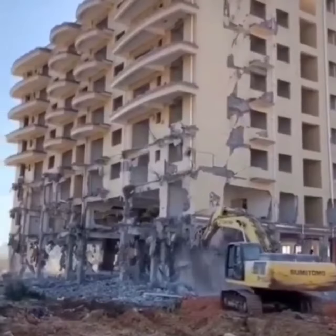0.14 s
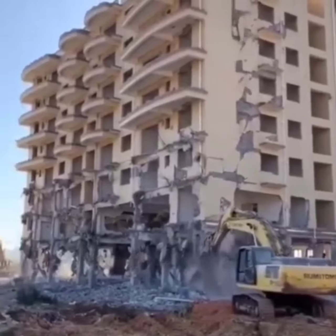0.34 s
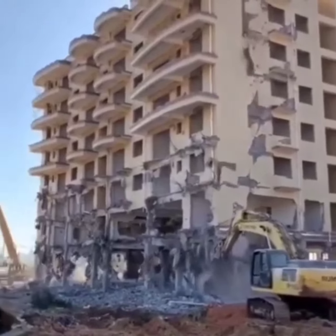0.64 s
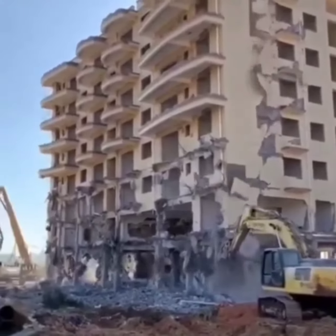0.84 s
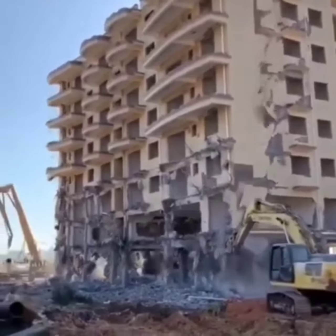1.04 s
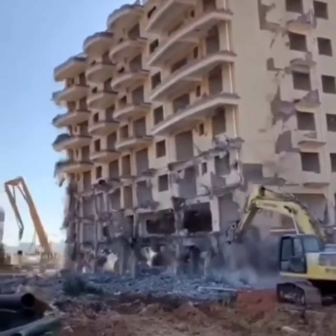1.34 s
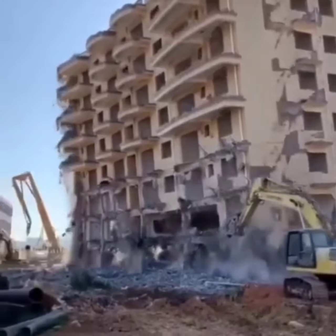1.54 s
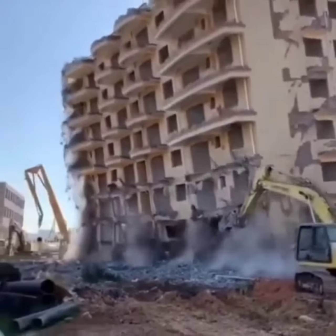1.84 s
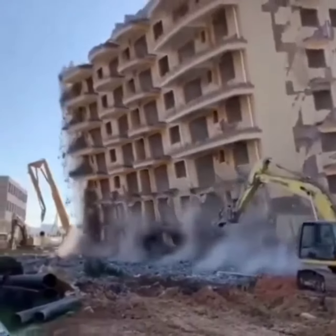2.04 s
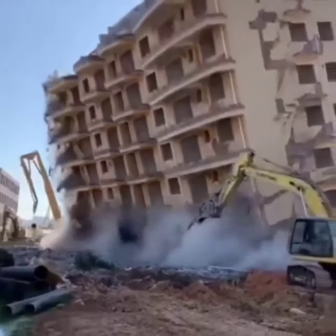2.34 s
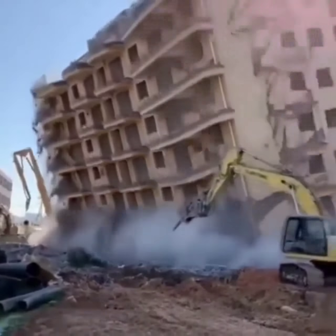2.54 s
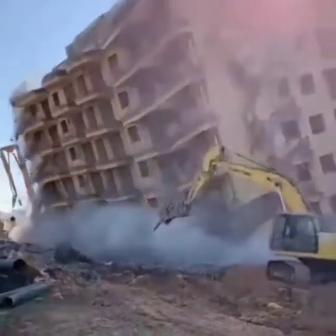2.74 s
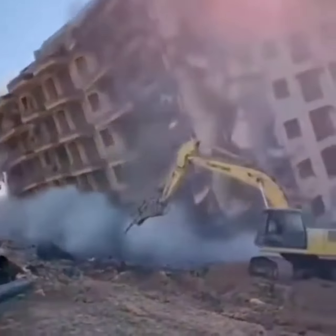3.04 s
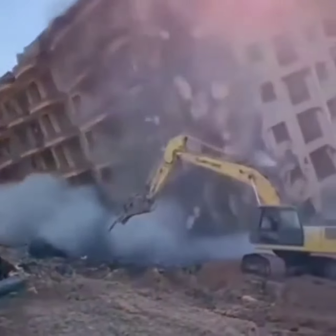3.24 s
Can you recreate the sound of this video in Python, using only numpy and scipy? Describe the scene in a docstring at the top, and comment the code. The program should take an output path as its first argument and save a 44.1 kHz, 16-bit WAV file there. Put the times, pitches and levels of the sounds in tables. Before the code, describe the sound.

A tall concrete building collapses in a continuous roar of sliding rubble over a deep rumble. Slabs thud and chunks crack and clink throughout, heard outdoors from tens of metres away, with a faint diesel hum underneath.

```python
"""A demolition site, some tens of metres from a tall concrete building as it topples.
An excavator's diesel hums beneath the rumble of the ground. Blocks tumble, slabs thud, and a dense
slide of rubble and grit roars, with single cracks, clinks and spills on top. The facades around answer
the single hits. One fixed microphone, with a narrow notch in the treble."""
import sys
import numpy as np
from scipy import signal
from scipy.fft import rfft, irfft, next_fast_len
from scipy.io import wavfile
from scipy.ndimage import uniform_filter1d, map_coordinates

SR = 44100
rng = np.random.default_rng(int(sys.argv[2]) if len(sys.argv) > 2 else 0)


def master(y):
    """Save y as 16-bit WAV."""
    cut = np.clip(np.atleast_2d(y).T, -1, 1)
    pcm = np.round(cut * 32767)  # scale
    wavfile.write(sys.argv[1], SR, pcm.astype(np.int16))


N = 149940  # 3.4 s


def amp(db):
    """Decibels to gain."""
    return 10 ** (np.asarray(db) / 20)


def unit(x):
    """Scaled to rms 1."""
    return x / np.sqrt(np.mean(x ** 2) + 1e-20)


def along(points, hz):
    """(frequency, value) points read on a log frequency axis."""
    knots_hz, values = np.transpose(points)
    return np.interp(np.log(hz + 1), np.log(knots_hz + 1), values)


def curves(rows):
    """One value per sample for each column after the time."""
    times, *columns = np.transpose(rows)
    return [np.interp(np.arange(N) / SR, times, column) for column in columns]


def wobble(rate, samples=N, knots=1024):
    """A smooth random curve, rate knots a second."""
    return map_coordinates(rng.standard_normal(knots), [np.arange(samples) * rate / SR], mode="wrap")


def filtered(x, response):
    """x through a filter whose gain is response(hz)."""
    n = x.shape[-1]
    padded = next_fast_len(n + SR // 4)
    return irfft(rfft(x, padded) * response(np.fft.rfftfreq(padded, 1 / SR)), padded)[:n]


def coloured(x, colour):
    """x shaped by a spectrum, at rms 1."""
    return unit(filtered(x, lambda hz: amp(along(colour, hz))))


def tone(hz, drift):
    """A sine at rms 1, its phase pushed about by drift (radians)."""
    t = np.arange(len(drift)) / SR
    return np.sqrt(2) * np.sin(2 * np.pi * hz * t + drift)


def add(track, start_s, sound):
    """Mixes a sound into the track."""
    part = track[max(round(start_s * SR), 0):][:len(sound)]
    part += sound[:len(part)]


def impacts(lo_hz, hi_hz, cycles, spread_db, count, size):
    """A shower of random knocks, each size samples long and dying by 60 dB over so many cycles."""
    when, pitch, strength, polarity = rng.random((count, 4)).T[:, :, None]
    hz = lo_hz * (hi_hz / lo_hz) ** pitch
    age = np.arange(size)
    phase = hz * age / SR
    strength_db = -spread_db * np.log(np.maximum(strength, .01))
    envelope = hz * amp(strength_db - 60 * phase / cycles)  # the factor hz keeps the shower about flat
    knocks = envelope * np.sin(2 * np.pi * phase) * np.sign(polarity - .5)
    positions = (when * N).astype(int) + age
    return unit(np.bincount(positions.ravel(), knocks.ravel(), N)[:N])


def wash(patchy_db, size):
    """The blur of countless hidden impacts: noise in which single pitches flare up briefly."""
    frames = dict(nperseg=size, noverlap=size * 3 // 4)
    spectra = signal.stft(rng.standard_normal(N), **frames)[2]
    flares = uniform_filter1d(rng.standard_normal(spectra.shape), size=3, axis=0)
    flares = unit(uniform_filter1d(flares, size=5, axis=1))
    return signal.istft(spectra * amp(patchy_db * np.minimum(flares, 2)), **frames)[1][:N]


def fall(knocks, blur, colour, wash_db):
    """Near knocks over the wash of the hidden ones."""
    return unit(coloured(knocks, colour) + amp(wash_db) * coloured(blur, colour))


# reverberation between the buildings around the site (frequency [Hz], t60 [s])
FACADE_DECAY = [(100, 1), (1000, 0.67), (7000, 0.33)]
def facades(x, wet_db):
    """The direct sound with its diffuse answer from the buildings; the treble dies first."""
    hz, t, spectra = signal.stft(rng.standard_normal(SR // 2), SR, nperseg=256)
    decay = amp(-60 * t / along(FACADE_DECAY, hz)[:, None])
    tail = signal.istft(spectra * decay, SR, nperseg=256)[1]
    return x + amp(wet_db) * signal.fftconvolve(x, tail / np.linalg.norm(tail))[:N]


# the engine's firing lines (frequency [Hz], level [dB])
DIESEL_LINES = [(59, -37.5), (88.5, -41)]
def diesel(drift_rad=0.69):
    """The excavator's engine hums unsteadily under the collapse."""
    return sum(amp(db) * tone(hz, drift_rad * wobble(3.58)) for hz, db in DIESEL_LINES)


# swell of the ground rumble (time [s], level [dB])
RUMBLE_SWELL = [(0.0, -42), (0.28, -30.5), (0.48, -32), (0.63, -34), (0.78, -30), (0.84, -33), (0.93, -26),
                (1.2, -31), (1.32, -30), (1.42, -26), (1.66, -31), (1.8, -23), (2.1, -25.5), (2.25, -27),
                (2.45, -26.5), (2.54, -32), (2.66, -25), (2.95, -28), (3.12, -31.5), (3.21, -38),
                (3.27, -25), (3.4, -28.5)]
# its spectrum (frequency [Hz], relative level [dB])
RUMBLE_SPECTRUM = [(10, -21.5), (22, -6.5), (42, 3.5), (60, 2), (85, -2.5), (115, -5), (200, -36),
                   (500, -63)]
def rumble(gain_db=-2.0, lumpy_db=1):
    """The ground and the falling mass shake the air."""
    level_db, = curves(RUMBLE_SWELL)
    envelope = amp(level_db + gain_db + lumpy_db * wobble(11))
    return envelope * coloured(rng.standard_normal(N), RUMBLE_SPECTRUM)


# loose debris landing (time [s], level [dB], length before release [s], band centre [Hz])
DEBRIS_SPILLS = [(0.154, -32, 0.039, 1100), (0.323, -33, 0.028, 3300), (0.551, -34, 0.026, 2700),
                 (0.718, -34, 0.027, 2700), (0.857, -29.5, 0.031, 2380), (0.921, -34, 0.049, 1690),
                 (1.307, -29.5, 0.019, 3800), (1.407, -29.5, 0.13, 1400), (1.56, -26.5, 0.029, 2010),
                 (1.641, -29, 0.023, 2800), (1.908, -31.5, 0.026, 2800), (2.098, -27.5, 0.04, 1300),
                 (2.159, -34.5, 0.018, 6000), (2.304, -33, 0.025, 2600), (2.964, -32, 0.021, 4500)]
# spectrum of crumbling and splintering debris (frequency [Hz], relative level [dB])
DEBRIS_SPECTRUM = [(200, -20.5), (600, -1.5), (1500, -2.5), (2600, -7), (4000, -26.5), (7500, -18)]
def spills(gain_db=0, attack_s=0.0064, release_t60=0.15, width_octaves=0.91):
    """Loads of loose debris crumble onto the heap; the finer the pieces, the higher the burst."""
    out, t = np.zeros(N), np.arange(SR) / SR
    for start, db, length, centre_hz in DEBRIS_SPILLS:
        envelope = (1 - np.exp(-t / attack_s)) * amp(-60 * np.maximum(t - length, 0) / release_t60)
        band = lambda hz: np.exp(-.5 * (np.log2((hz + 1) / centre_hz) / width_octaves) ** 2)
        pieces = filtered(wash(patchy_db=1.5, size=1024)[:SR], band)
        add(out, start, amp(db + gain_db) * envelope * coloured(pieces, DEBRIS_SPECTRUM))
    return out


# chunks of concrete snapping and knocking together (time [s], level [dB], pitch [Hz])
CONCRETE_CRACKS = [(.155, -27, 546), (.168, -31.5, 770), (.228, -26.5, 522), (.246, -29, 1098),
                   (0.795, -22, 1620), (.803, -24, 495), (0.955, -29, 1134), (1.128, -24, 1018),
                   (1.435, -26.5, 760), (1.532, -24, 1593), (1.646, -25, 1404), (1.692, -24.5, 660),
                   (1.719, -25.5, 1210), (1.794, -26, 760), (2.039, -23, 732), (2.18, -30.5, 1376),
                   (2.227, -30, 1676), (2.363, -25, 735), (2.375, -25.5, 1654), (2.833, -23.5, 678),
                   (2.861, -26.5, 1515), (2.904, -31, 663), (3.018, -27.5, 1604), (3.089, -25, 1537),
                   (3.117, -26, 632), (3.138, -30.5, 1480), (3.189, -24, 737), (3.272, -27, 1566)]
def cracks(attack_s=0.004, clack_t60=0.14, splinter_db=-2, splinter_t60=0.1):
    """Concrete snaps: a pitched clack under a shorter, broad splintering."""
    out, t = np.zeros(N), np.arange(SR) / SR
    for start, db, hz in CONCRETE_CRACKS:
        clack = amp(-60 * t / clack_t60) * tone(hz, 0.66 * wobble(hz / 6, len(t)))
        noise = coloured(rng.standard_normal(SR), DEBRIS_SPECTRUM)
        splinter = amp(splinter_db - 60 * t / splinter_t60) * noise
        add(out, start, amp(db) * (1 - np.exp(-t / attack_s)) * (clack + splinter))
    return out


# tile and reinforcing bar ringing out (time [s], level [dB], pitch [Hz])
TILE_AND_BAR_CLINKS = [(.195, -25, 2191), (.375, -29, 2568), (.995, -23, 2654), (1.18, -23, 1810),
                       (1.589, -21, 2245), (2.074, -27, 2396), (2.146, -30, 2220), (2.845, -26, 2055),
                       (2.906, -22, 1320), (3.355, -22.5, 1423)]
def clinks(gain_db=-1, attack_s=0.012, t60=0.16):
    """Hard pieces ring briefly as they strike the heap."""
    out, t = np.zeros(N), np.arange(SR) / SR
    for start, db, hz in TILE_AND_BAR_CLINKS:
        envelope = amp(db + gain_db - 60 * t / t60) * (1 - np.exp(-t / attack_s))
        add(out, start, envelope * tone(hz, 0.92 * wobble(hz / 6, len(t))))
    return out


# tumbling masonry (time [s], block level [dB], brick level [dB])
MASONRY_FLOW = [(0.05, -40, -36.5), (0.15, -34.5, -37), (0.29, -35.5, -37.5), (0.4, -30.5, -36.5),
                (0.63, -33.5, -36), (0.98, -30.5, -35.5), (1.25, -28.5, -32.5), (1.4, -29.5, -31.5),
                (1.6, -31, -32), (1.87, -33, -32), (1.97, -27.5, -35.5), (2.26, -29, -34),
                (2.55, -28.5, -32.5), (2.9, -29.5, -31.5), (2.97, -36, -33.5), (3.05, -26, -29),
                (3.14, -27.5, -32.5), (3.24, -28, -34), (3.35, -34.5, -31)]
# spectra of big blocks and of bricks (frequency [Hz], relative level [dB])
BLOCK_SPECTRUM = [(50, -27), (105, -1), (140, 0), (185, -1.5), (250, -8), (350, -19), (700, -46)]
BRICK_SPECTRUM = [(130, -18), (250, -4.5), (320, -1), (420, -2.5), (520, 0), (640, -7.5), (1200, -44)]
def masonry(block_db=-2, brick_db=-0.5):
    """Big blocks tumble with dull knocks, bricks with lighter ones."""
    block_flow_db, brick_flow_db = curves(MASONRY_FLOW)
    knocks = impacts(lo_hz=91.8, hi_hz=693, cycles=9.8, spread_db=2.17, count=700, size=6144)
    blur = wash(patchy_db=3.5, size=2048)
    blocks = fall(knocks, blur, BLOCK_SPECTRUM, wash_db=-2)
    bricks = fall(knocks, blur, BRICK_SPECTRUM, wash_db=3)
    return amp(block_flow_db + block_db) * blocks + amp(brick_flow_db + brick_db) * bricks


# heavy slabs landing (time [s], level [dB], pitch [Hz], t60 [s])
SLAB_LANDINGS = [(.235, -25, 80, 0.19), (0.509, -21, 199, 0.11), (.668, -16.5, 54, 0.12),
                 (0.704, -19.5, 184, 0.12), (.88, -16.5, 49, .2), (.903, -19.5, 185, 0.13),
                 (1.041, -22, 90.4, 0.19), (1.124, -16.5, 75, .15), (1.155, -24, 302, 0.14),
                 (1.204, -22.5, 66, 0.33), (1.322, -16.5, 142.5, 0.15), (1.526, -20, 68, .16),
                 (1.642, -23.5, 474, 0.13), (1.731, -19, 48, 0.21), (1.835, -24.5, 430, 0.11),
                 (1.857, -20, 84, .16), (1.985, -21.5, 57, 0.18), (2.165, -23, 416, .12),
                 (2.169, -14, 53.4, 0.16), (2.25, -16.5, 58.7, 0.35), (2.282, -17, 157, 0.094),
                 (2.358, -16.5, 42, 0.17), (2.574, -17, 66, 0.19), (2.713, -19.5, 156, 0.15),
                 (2.779, -24.5, 92, 0.17), (2.849, -20, 93, 0.14), (2.912, -18, 181, 0.14),
                 (3.015, -23, 436, 0.096), (3.024, -20, 253, 0.17), (3.042, -18, 192, 0.32),
                 (3.106, -27.5, 87, 0.26), (3.12, -17.5, 236, .13), (3.269, -23, 189, 0.17)]
def slabs(attack_s=0.0083, drift_rad=0.13):
    """Each slab lands with a low, unsteady thud."""
    out, t = np.zeros(N), np.arange(SR // 2) / SR
    for start, db, hz, t60 in SLAB_LANDINGS:
        envelope = amp(db - 60 * t / t60) * (1 - np.exp(-t / attack_s))
        add(out, start, envelope * tone(hz, drift_rad * wobble(hz / 2, len(t), knots=256)))
    return out


# the slide, from tens of metres off (time [s], rubble level [dB], grit level [dB])
SLIDE_FLOW = [(0.0, -28.5, -39), (0.04, -34, -41), (0.13, -31, -42), (0.19, -29, -35.5),
              (0.25, -30.5, -37.5), (0.3, -31, -40.5), (0.34, -30, -36), (0.42, -30, -38),
              (0.52, -27.5, -37), (0.67, -30.5, -37.5), (0.74, -26.5, -33), (0.78, -30, -38),
              (0.88, -26, -33), (1.02, -28.5, -36), (1.08, -26.5, -34.5), (1.3, -27, -33.5),
              (1.37, -27, -33), (1.43, -25.5, -32), (1.65, -26.5, -30.5), (1.78, -25.5, -30.5),
              (2.17, -25, -32.5), (2.4, -27.5, -35.5), (2.52, -27.5, -35), (2.65, -27, -35.5),
              (3.05, -26.5, -35), (3.4, -27, -36.5)]
# spectra of rubble and of grit (frequency [Hz], relative level [dB])
RUBBLE_SPECTRUM = [(250, -38), (450, -14), (600, -0.5), (720, 1), (900, -2.5), (1200, -3), (1600, -1.9),
                   (2000, -5), (2600, -7.5), (3200, -16), (4300, -25), (7500, -37)]
GRIT_SPECTRUM = [(1500, -20.5), (2700, -2), (3300, -1), (4200, -4.5), (5500, -6.5), (6300, -6),
                 (7000, -3.3), (7700, -8)]
def slide(rubble_db=-0.5, grit_db=-1, rubble_surge_db=0.48, grit_surge_db=0.75):
    """Rubble clatters and grit crackles down, surging together."""
    rubble_flow_db, grit_flow_db = curves(SLIDE_FLOW)
    surge = wobble(55)
    stones = impacts(lo_hz=333.3, hi_hz=4172, cycles=126, spread_db=2.0, count=1100, size=3584)
    chips = impacts(lo_hz=2377, hi_hz=8100, cycles=49, spread_db=1.5, count=3000, size=1024)
    rubble = fall(stones, wash(patchy_db=3.0, size=1536), RUBBLE_SPECTRUM, wash_db=5.5)
    grit = fall(chips, wash(patchy_db=7.5, size=1536), GRIT_SPECTRUM, wash_db=11.0)
    rubble *= amp(rubble_flow_db + rubble_db + rubble_surge_db * surge)
    grit *= amp(grit_flow_db + grit_db + grit_surge_db * surge)
    return rubble + grit


def scene():
    """The whole collapse as it reaches the microphone, in mono."""
    hits = slabs() + cracks() + clinks() + spills()
    return (rumble() + masonry() + slide() + diesel() + facades(hits, wet_db=-17))[None]


def record(dry, ceiling=0.3, notch_hz=4964, half_width_hz=290, notch_depth=0.73, top_hz=7680):
    """Microphone and recorder round off the tallest peaks, notch the treble and cut all above top_hz."""
    rounded = dry[0] / (1 + np.abs(dry[0] / ceiling) ** 6) ** (1 / 6)
    notch = lambda hz: 1 - notch_depth / (1 + ((hz - notch_hz) / half_width_hz) ** 2)
    band_limit = lambda hz: np.clip((top_hz - hz) / 100, 0, 1) ** 2
    return filtered(rounded, lambda hz: notch(hz) * band_limit(hz))[None]


dry = scene()
out = record(dry)
master(out)
```